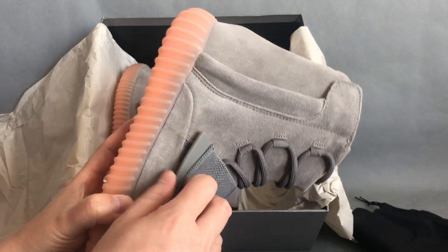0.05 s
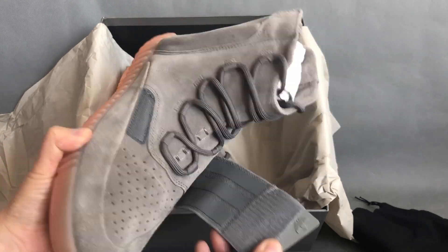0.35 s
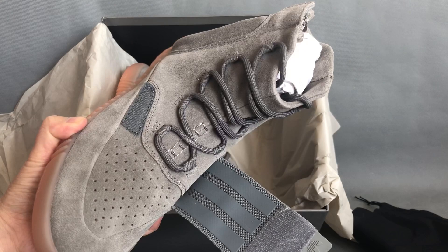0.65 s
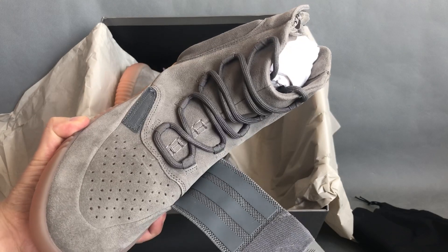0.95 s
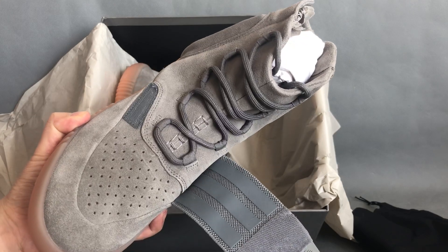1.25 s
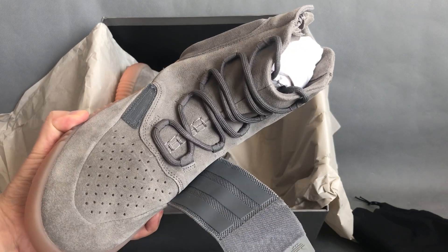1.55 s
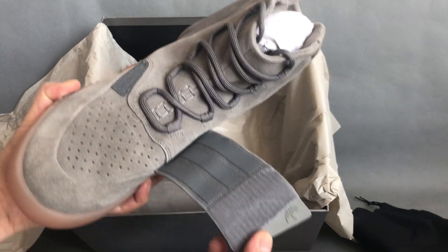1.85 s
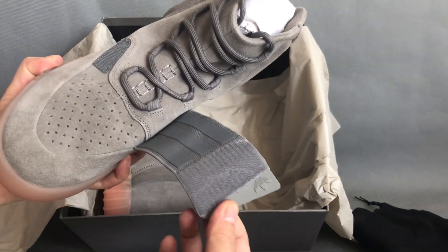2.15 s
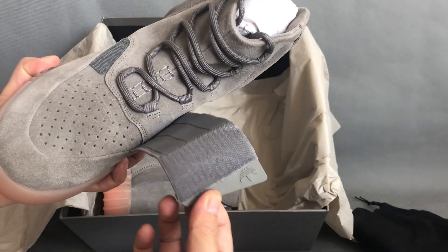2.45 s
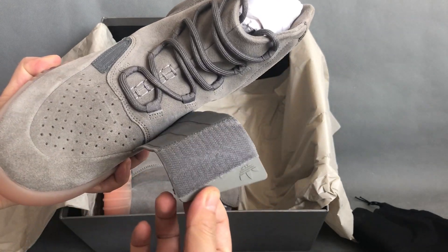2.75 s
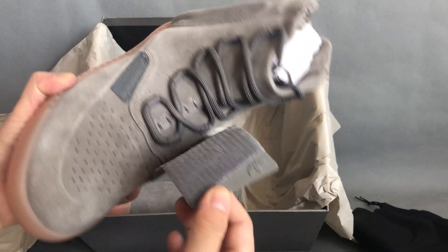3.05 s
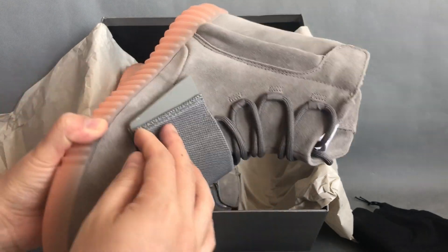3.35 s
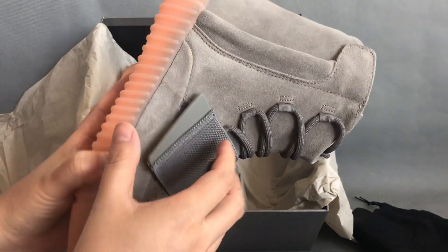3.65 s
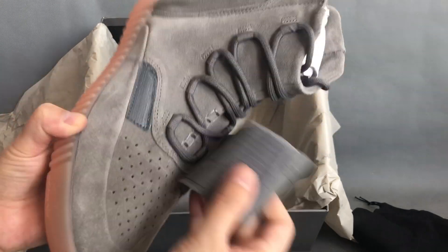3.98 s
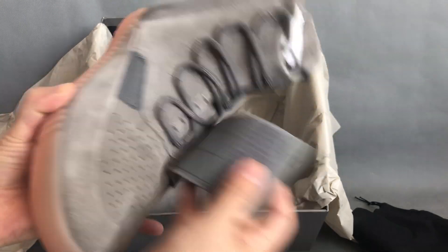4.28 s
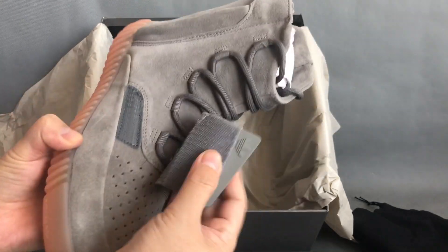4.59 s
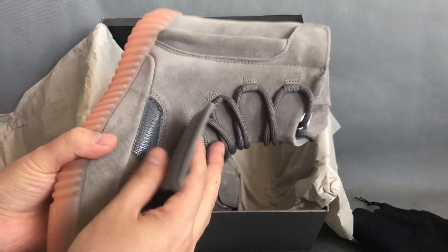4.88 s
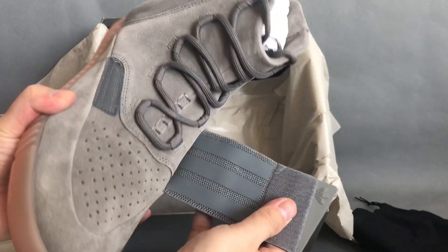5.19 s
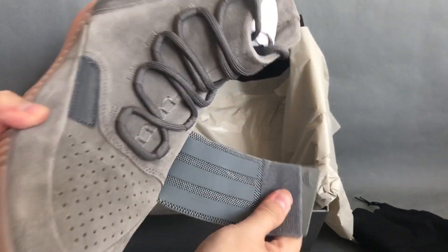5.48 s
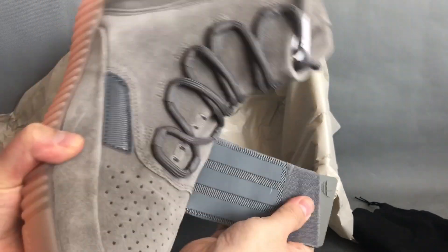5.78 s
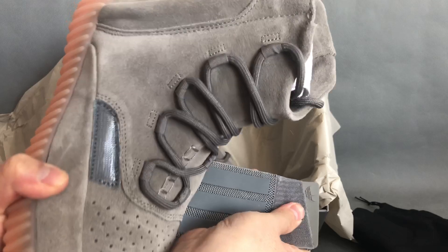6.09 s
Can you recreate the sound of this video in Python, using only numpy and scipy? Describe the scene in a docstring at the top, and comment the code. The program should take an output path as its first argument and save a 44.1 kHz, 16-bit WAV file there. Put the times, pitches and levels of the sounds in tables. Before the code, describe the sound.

Hands work the hook-and-loop strap of a suede shoe near a phone microphone indoors. A brief crackling tear with sharp snaps comes first, followed by a pause holding little but low ventilation noise. A small click and a few ticks lead to a second, shorter rip, loud and crisp. Quiet rubbing on suede and soft taps of the slack strap fill the rest.

```python
"""Hook-and-loop sneaker strap

Hands work the strap of a suede sneaker over its box, close to a phone in a small room: ripped open,
pressed shut, popped open again and flexed. Hooks snap singly and in crackling runs, the slack strap
flaps with a falling pitch, fingers slide on the suede, and ventilation murmurs behind."""
import sys
import numpy as np
from scipy import signal
from scipy.fft import rfft, irfft, next_fast_len
from scipy.io import wavfile
from scipy.ndimage import uniform_filter1d

SR = 44100
rng = np.random.default_rng(int(sys.argv[2]) if len(sys.argv) > 2 else 0)


def materialize(psi):
    """Save the field psi as 16-bit PCM at rate SR to the path in sys.argv[1].

    A 1-D psi becomes a single channel; in a 2-D psi each row is a channel.
    """
    bounded = np.clip(np.atleast_2d(psi).T, -1, 1)
    quanta = np.round(bounded * 32767).astype(np.int16)
    wavfile.write(sys.argv[1], SR, quanta)


N = 274743

# swell of the slow rip, and of the quick pop before its gain: time_s, level_db
RIP_SWELL = [(0.199, -33), (0.207, -36), (0.215, -29), (0.243, -31.5), (0.275, -18), (0.298, -36)]
POP_SWELL = [(3.843, -35.5), (3.855, -31), (3.872, -48.5)]
# the first rows loosening ahead of the rip: time_s, level_db
RIP_LEAD_IN = (.172, -40)
# single hooks letting go: start_s, peak_db, ring_hz, focus_db_per_octave
HOOK_SNAPS = [(.0675, -43, 4500, 2), (.1095, -38.5, 3495, 7), (.124, -39.5, 5000, 2.5),
              (.1646, -14.5, 2996, 5.5), (.1823, -18, 3000, 2), (0.1914, -11, 3604, 6),
              (.2745, -8.5, 7000, 5), (.2767, -11, 7000, 3), (.2935, -18, 2500, 5), (.334, -24, 6500, 1),
              (2.163, -49.5, 5000, 7.5), (3.3065, -46, 2500, 8), (3.3588, -24, 9000, 10),
              (3.3624, -27, 4000, 12), (3.755, -39.5, 5500, -0.5), (3.7698, -30, 4870, 11),
              (3.7937, -34.5, 5000, 4), (3.8283, -24.5, 4000, 5), (3.8476, -6.5, 4270, 20.5),
              (3.852, -8, 5550, 14), (3.8563, -6.5, 4630, 19.5), (3.870, -19, 3020, 7),
              (4.9395, -36, 2500, 2), (5.9145, -29.5, 2200, 9)]
# the strap flapping onto the shoe: start_s, peak_db, first_hz, last_hz
STRAP_FLAPS = [(0.1655, -39.5, 655, 282), (.258, -33.5, 340, 250), (.274, -25, 1400, 814),
               (.289, -28.5, 420, 135), (3.314, -44.5, 250, 180), (3.3501, -32.5, 350, 220),
               (3.364, -37.5, 520, 300), (3.8275, -39.5, 890, 395), (3.845, -34.5, 500, 328),
               (3.8554, -29.5, 1810, 896), (3.861, -23.5, 420, 335), (3.8623, -27.5, 250, 200),
               (3.922, -43, 450, 280), (4.4003, -38, 1100, 200), (4.416, -35.5, 596, 180),
               (4.4329, -33.5, 1610, 230), (4.943, -40, 565, 330), (5.301, -45.5, 200, 147),
               (5.756, -44, 220, 150), (5.925, -40.5, 430, 330)]
# the strap scraping the shoe: start_s, length_s, level_db, centre_hz, focus_db_per_octave
STRAP_SCRAPES = [(2.4, 0.48, -63, 1500, 15), (2.86, .12, -65, 1790, 14.5), (3.342, 0.041, -47.5, 1800, 1),
                 (4.407, 0.034, -54.5, 3500, 4.5), (4.934, 0.032, -47, 2500, 0.5),
                 (5.735, 0.027, -52.5, 3000, 6.5), (5.898, 0.054, -46, 2200, 4.5)]
# low finger rasps and high strap swishes on suede: middle_s, width_s, relative_level_db, centre_hz
SUEDE_STROKES = [(.09, 0.11, -63, 5000), (3.33, .08, -66, 6000), (3.558, 0.064, -58.5, 6000),
                 (3.792, .1, -59, 5000), (4.03, .2, -58, 10040), (4.16, 0.052, -57, 6000),
                 (4.299, 0.031, -60, 3480), (4.377, .04, -59.5, 5000), (4.563, .06, -60, 4500),
                 (4.83, 0.14, -63.5, 5960), (5.051, .13, -59, 8000), (5.203, 0.041, -54, 4000),
                 (5.344, 0.046, -57, 6000), (5.599, .06, -63, 7000), (5.834, 0.032, -58.5, 4000),
                 (5.887, 0.066, -62, 14000), (6.06, .13, -61, 8000)]
# tone of hook clicks, of the padded shoe's thud and of rubbed suede: frequency_hz, gain_db
HOOK_EQ = [(120, -31), (250, -10), (400, -4), (620, -12), (950, -11.5), (1600, -5), (2000, -7), (2600, -2),
           (3800, -6.5), (5500, -5), (6800, -4), (9000, -5.5), (11500, -10), (17000, -10)]
SHOE_EQ = [(40, -20), (110, -2.5), (210, -2), (340, -4), (550, -7.5), (900, -6), (1600, -11), (4000, -40),
           (10000, -60)]
SUEDE_EQ = [(200, -17), (350, 12), (700, -13.5), (1800, -10.5), (3000, 2.5), (4300, -0.5), (6000, -4.5),
            (8500, -4), (12000, -10.5), (17000, -14)]
# tone of the ventilation, low rumble and airy top: frequency_hz, gain_db
RUMBLE_EQ = [(20, -15), (30, -8), (42, 3.5), (52, 8), (63, -0.5), (75, 5), (90, -4.5), (130, -0.5),
             (170, -4), (205, -0.5), (265, -4.5), (300, -6)]
AIR_EQ = [(420, -12.5), (520, -9), (610, -12.5), (730, -7), (950, -6), (1100, -11), (1550, -13),
          (2000, -20.5), (2300, -21.5), (3000, -30.5), (5000, -37), (10000, -42.5), (17000, -47)]


def tear(swell, gain_db, centre_hz, focus_db, row_hz, jerk_db, uneven=.04):
    """One pull peels the strap row by row: each row of hooks gives at once, then its crackle fades."""
    out = np.zeros(N)
    times, level_db = np.transpose(swell)
    t = np.arange(times[0], times[-1], 1 / SR)
    rows_freed = np.cumsum(row_hz * (1 + uneven * drift(row_hz)[:len(t)])) / SR
    jerks = unit(undb(-jerk_db * (rows_freed % 1)))
    envelope = undb(np.interp(t, times, level_db) + gain_db) * jerks
    add(out, times[0], crackle(envelope, centre_hz, focus_db))
    return out


def crackle(envelope, centre_hz, focus_db, hooks_per_s=4500, fizz_db=-5):
    """The contact line jumps along the strap, freeing a dense run of hooks over a fizz of fine fibres."""
    hooks = unit(clicks(len(envelope), hooks_per_s, spread_db=3.5))
    fizz = undb(fizz_db) * rng.standard_normal(len(envelope))
    run = np.pad((hooks + fizz) * envelope, (0, SR // 100))
    run = equalise(run, HOOK_EQ, centre_hz, focus_db)
    return run * np.sqrt(np.sum(envelope ** 2) / np.sum(run ** 2))


def snaps(shiver_db=-25, shiver_s=.0014):
    """A freed hook cracks and rings for a cycle or two; the fabric round it shivers a few ms longer."""
    out = np.zeros(N)
    t = np.arange(SR // 100) / SR
    for start_s, peak_db, ring_hz, focus_db in HOOK_SNAPS:
        crack = t == 0
        shiver = rng.standard_normal(len(t)) * np.exp(-t / shiver_s) * (t > 1 / ring_hz)
        snap = equalise(crack + undb(shiver_db) * shiver, HOOK_EQ, ring_hz, focus_db)
        # all-pass: the hook holds back the sound near its own pitch
        snap = snap - 2 * signal.lfilter(*signal.iirpeak(ring_hz, 1, fs=SR), snap)
        add(out, start_s, undb(peak_db) * snap / np.abs(snap).max())
    return out


def strap(hooks, ripple_db=-29, thud_db=-11, thud_s=.019):
    """Every hook sends a small bending wave through the strap; big flaps also thud on the padded shoe."""
    ripple = bending_wave(first_hz=2000, last_hz=790, glide_s=.0012, swell_s=.0013)
    out = hooks + undb(ripple_db) * signal.fftconvolve(hooks, ripple)[:N]
    t = np.arange(SR // 10) / SR
    thud_envelope = (1 - np.exp(-t / .0015)) * np.exp(-t / thud_s)
    for start_s, peak_db, first_hz, last_hz in STRAP_FLAPS:
        # bending waves travel as the root of their pitch, so low flaps last longer
        slowness = np.sqrt(400 / np.sqrt(first_hz * last_hz))  # 1 at 400 Hz
        flap = bending_wave(first_hz, last_hz, glide_s=.0036 * slowness, swell_s=.0048 * slowness)
        thud = unit(equalise(rng.standard_normal(len(t)), SHOE_EQ)) * thud_envelope
        add(out, start_s, undb(peak_db) * (flap + undb(thud_db) * thud))
    return out


def bending_wave(first_hz, last_hz, glide_s, swell_s):
    """A bend runs down the strap, short waves first, so its pitch falls."""
    t = np.arange(SR // 10) / SR
    pitch_hz = last_hz + (first_hz - last_hz) * np.exp(-t / glide_s)
    envelope = (t / swell_s * np.exp(1 - t / swell_s)) ** 2
    return envelope * np.sin(2 * np.pi * np.cumsum(pitch_hz) / SR)


def scrapes(attack_share=.3, fade_db_per_length=-14.5):
    """The hooks brush the shoe: each scrape bites quickly and dies away."""
    out = np.zeros(N)
    for start_s, length_s, level_db, centre_hz, focus_db in STRAP_SCRAPES:
        progress = np.linspace(0, 1, int(length_s * SR))
        attack = np.minimum(progress / attack_share, 1)
        release = undb(fade_db_per_length * np.maximum(progress - attack_share, 0))
        add(out, start_s, crackle(undb(level_db) * attack * release, centre_hz, focus_db))
    return out


def sliding(grip_start_s=3.5, grip_fade_s=.4, grip_relative_db=-68.5, gain_db=-2.5, flutter_db=2.15):
    """Skin and strap on suede: strokes swell and fade; once the hand grips, it keeps rubbing."""
    t = np.arange(N) / SR
    grip = undb(grip_relative_db) * np.clip((t - grip_start_s) / grip_fade_s, 0, 1)
    out = grip * unit(equalise(fibres(), SUEDE_EQ))
    nap = fibres()
    for middle_s, width_s, level_db, centre_hz in SUEDE_STROKES:
        near = np.abs(t - middle_s) < 2 * width_s
        swell = undb(level_db) * np.exp(-2 * ((t[near] - middle_s) / width_s) ** 2)
        out[near] += swell * unit(equalise(nap[near], SUEDE_EQ, centre_hz, focus_db=3))
    return out * undb(gain_db + flutter_db * drift(rate_hz=50))


def fibres(catches_per_s=450, catch_db=-3):
    """Rubbed nap: a soft hiss, grainy where fibres catch."""
    catches = unit(clicks(N, catches_per_s, spread_db=7))
    return rng.standard_normal(N) + undb(catch_db) * catches


def room(x, box_db=-14, box_s=.004, tail_db=-17, t60_s=.27, treble_t60_s=.16, low_cut_hz=350):
    """Quick reflections off the box and table, then the room's short tail; the thumps stay dry."""
    t = np.arange(SR // 2) / SR
    box = rng.standard_normal(len(t)) * np.exp(-t / box_s) * (t > .001)
    diffuse = rng.standard_normal(len(t)) * (t > .006)
    body = signal.sosfiltfilt(signal.butter(2, 9000, fs=SR, output="sos"), diffuse)
    treble = diffuse - body
    tail = body * undb(-60 * t / t60_s) + treble * undb(-60 * t / treble_t60_s)
    echoes = (undb(box_db) * unit(box) + undb(tail_db) * unit(tail)) / np.sqrt(len(t))
    echoes = signal.sosfilt(signal.butter(1, low_cut_hz, "high", fs=SR, output="sos"), echoes)
    return x + signal.fftconvolve(x, echoes)[:N]


def ventilation(level_db=-52, drift_db=.75):
    """A bed of moving air, with rumble on the low modes of the room."""
    air = unit(equalise(rng.standard_normal(N), RUMBLE_EQ + AIR_EQ))
    return air * undb(level_db - drift_db * drift(rate_hz=.97))


def equalise(x, curve, centre_hz=1000, focus_db=0):
    """Apply an EQ curve, less focus_db per octave for two octaves either side of the centre."""
    size = next_fast_len(len(x) + 2048, True) // 2 * 2
    octave = np.log2(np.maximum(np.arange(size // 2 + 1) * SR / size, 10))
    curve_hz, curve_db = np.transpose(curve)
    off_centre = np.minimum(np.abs(octave - np.log2(centre_hz)), 2)
    gain_db = np.interp(octave, np.log2(curve_hz), curve_db) - focus_db * off_centre
    # minimum phase keeps attacks crisp: nothing rings ahead of a click
    cepstrum = irfft(np.log(undb(gain_db)))
    cepstrum[1:size // 2] *= 2
    cepstrum[size // 2 + 1:] = 0
    return irfft(rfft(x, size) * np.exp(rfft(cepstrum)))[:len(x)]


def clicks(size, per_s, spread_db):
    """Randomly timed impulses of uneven strength."""
    impulses = (rng.random(size) < per_s / SR) * rng.choice([-1, 1], size)
    return impulses * undb(spread_db * rng.standard_normal(size).clip(-2, 2))


def drift(rate_hz):
    """Smooth random modulation at rms 1."""
    hold = int(SR / rate_hz)
    steps = np.repeat(rng.standard_normal(N // hold + 1), hold)
    return unit(uniform_filter1d(steps, hold)[:N])


def undb(db):
    """Decibels to gain."""
    return 10 ** (np.asarray(db) / 20)


def unit(x):
    """Scale to rms 1."""
    return x / np.sqrt(np.mean(x ** 2) + 1e-18)


def add(track, start_s, sound):
    """Drop a sound onto the track."""
    i = max(int(start_s * SR), 0)
    track[i:i + len(sound)] += sound[:N - i]


def scene():
    """The mono mix: the strap up front in the room, soft suede beneath, ventilation behind."""
    rip = tear([RIP_LEAD_IN] + RIP_SWELL, gain_db=0, centre_hz=7000, focus_db=.25,
               row_hz=106.7, jerk_db=8)
    pop = tear(POP_SWELL, gain_db=6, centre_hz=4600, focus_db=5.5, row_hz=230, jerk_db=10)
    hooks = snaps() + rip + pop + scrapes()
    return (room(strap(hooks)) + sliding() + ventilation())[None]


def record(dry):
    """The phone cuts the top end steeply above 17.3 kHz."""
    return signal.sosfilt(signal.ellip(8, .2, 70, 17300, fs=SR, output="sos"), dry)


dry = scene()
out = record(dry)
materialize(out)
```